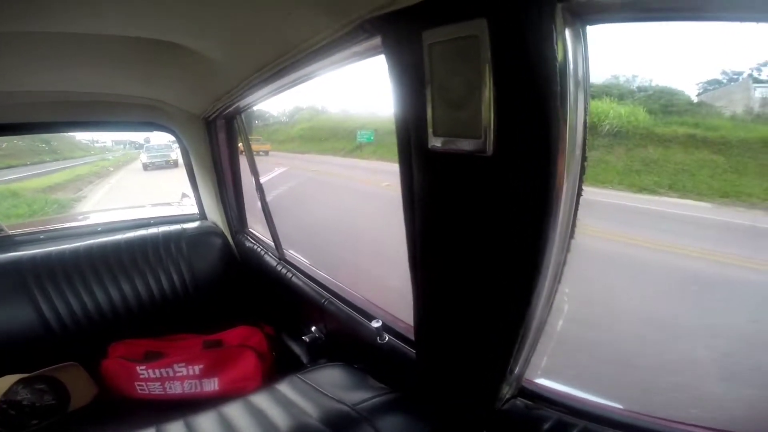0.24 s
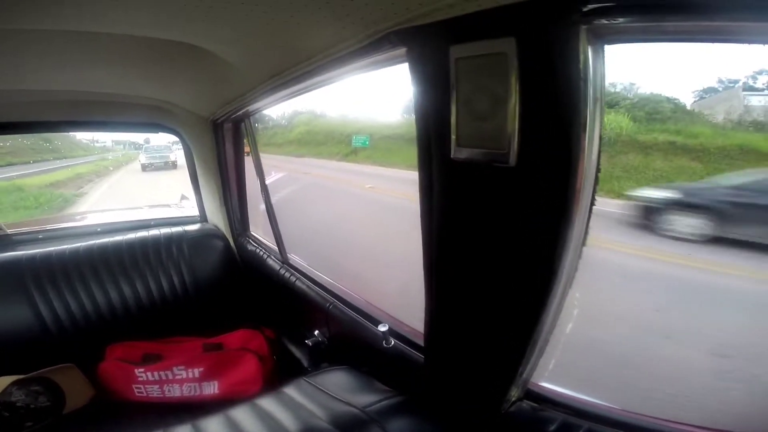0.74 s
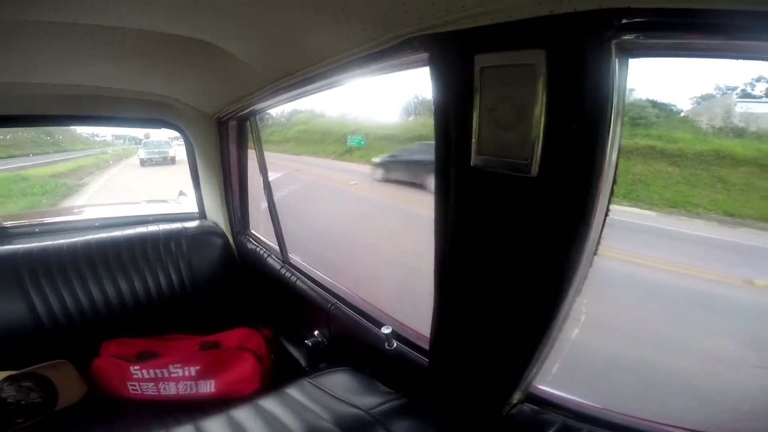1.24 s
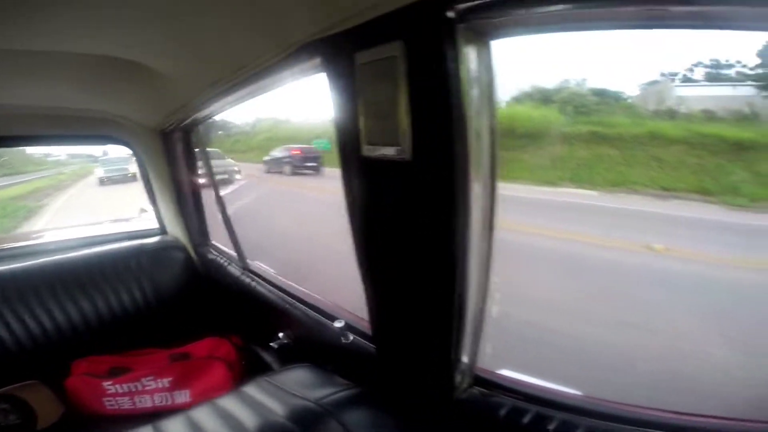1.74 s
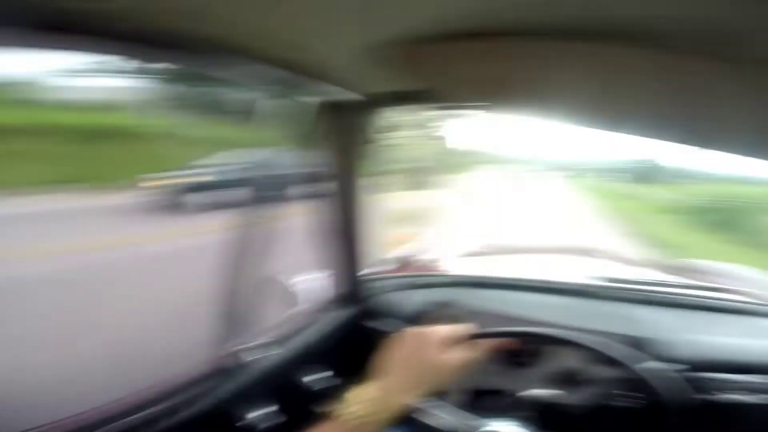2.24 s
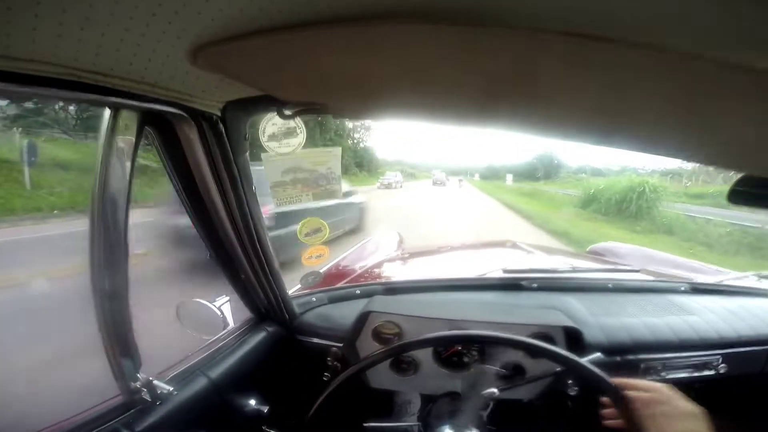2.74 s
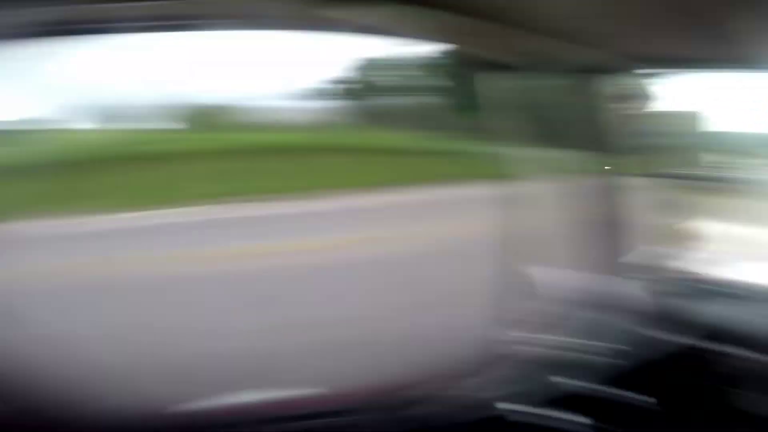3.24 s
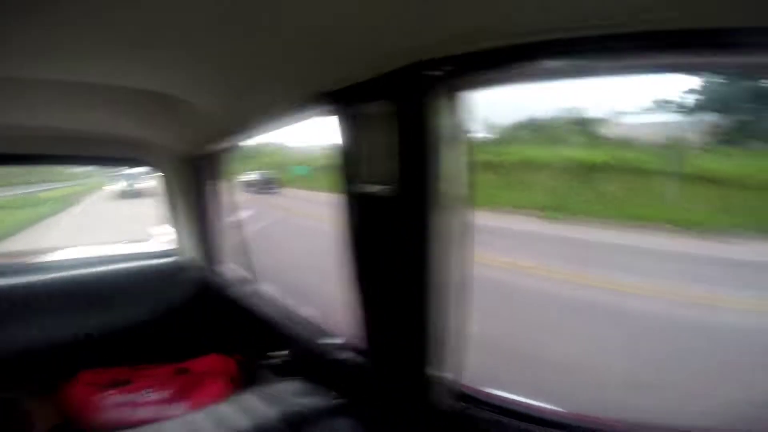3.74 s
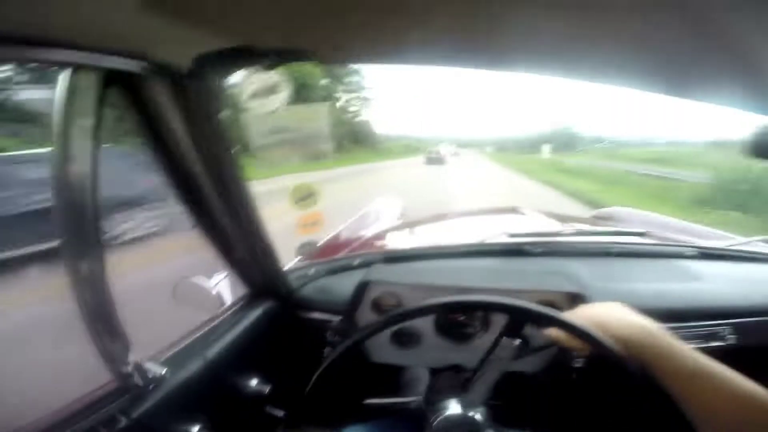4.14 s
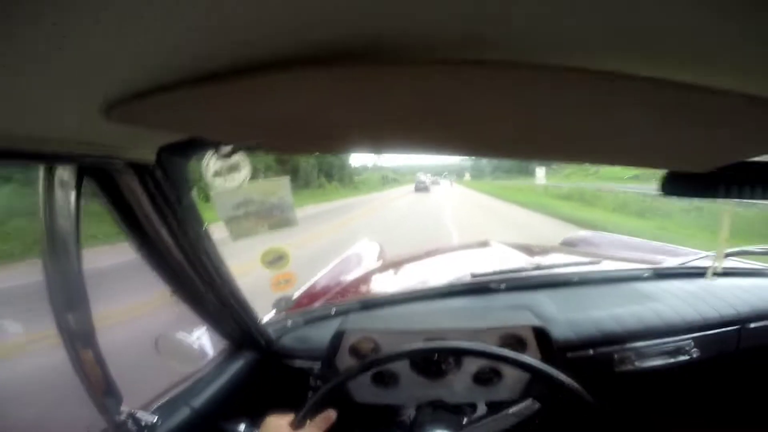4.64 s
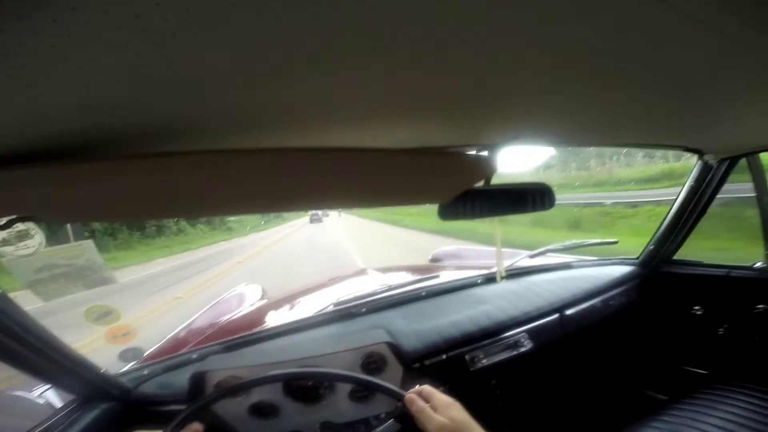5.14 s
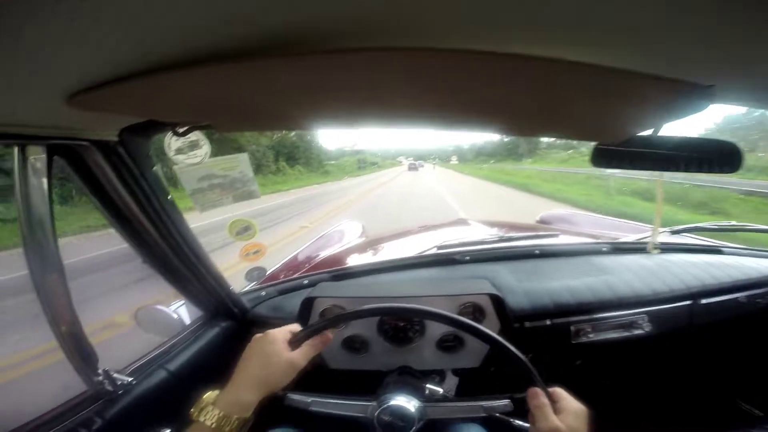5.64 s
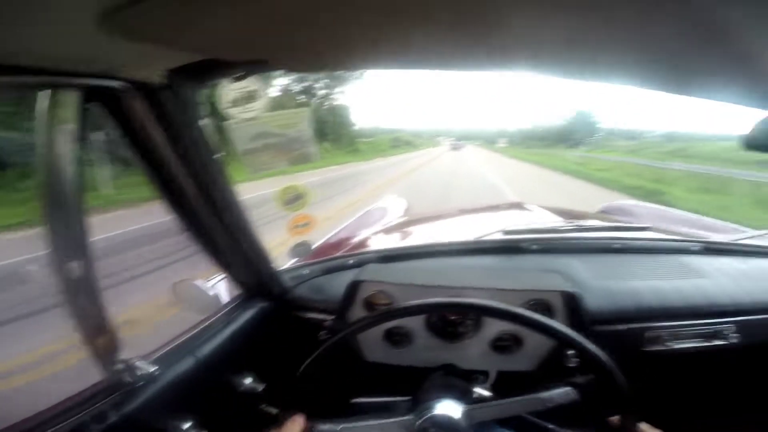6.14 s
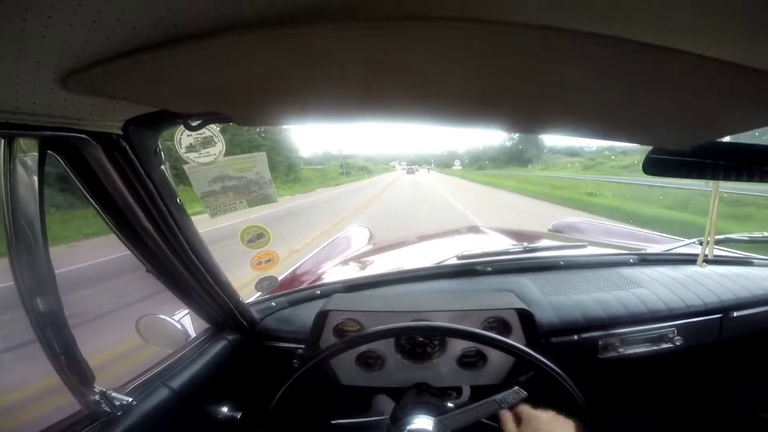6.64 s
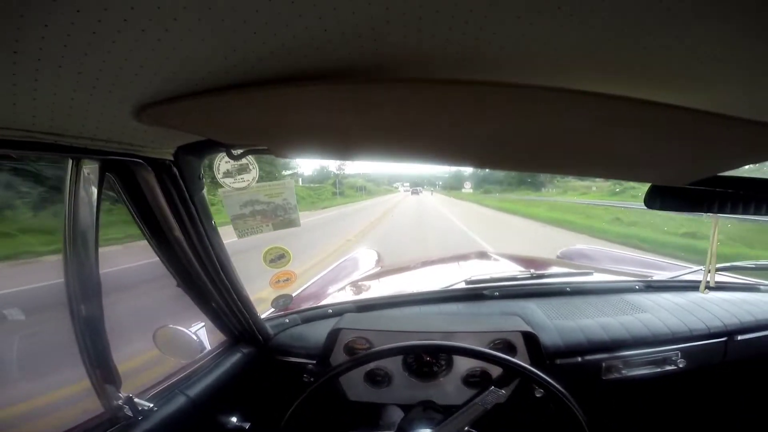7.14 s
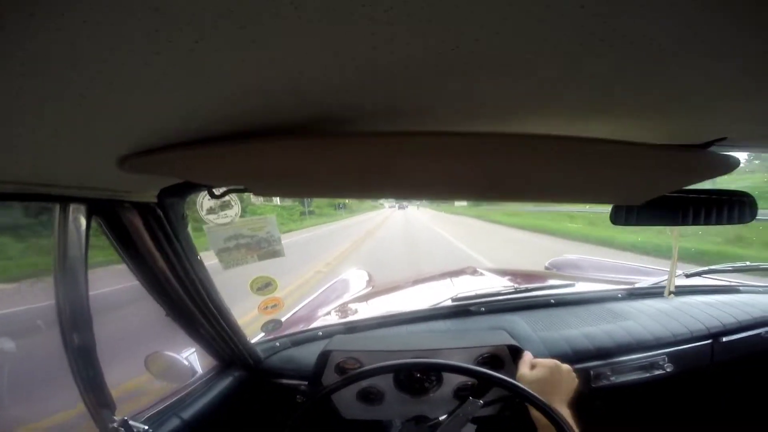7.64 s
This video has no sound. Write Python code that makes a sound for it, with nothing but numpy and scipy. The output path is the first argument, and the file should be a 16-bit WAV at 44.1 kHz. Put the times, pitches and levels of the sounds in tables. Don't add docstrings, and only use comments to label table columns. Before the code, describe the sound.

Close, boomy cabin sound of a vintage car leaving the roadside. Low uneven idle burble and faint electronic hiss come first, then a rush of passing traffic as the car moves off. The engine roars upward, falls for a clattering gear change with small squeaks, and climbs again with whining gears, road roar, buzzing panels and airy window hiss, finally dropping as the driver lifts off.

```python
import sys
import numpy as np
from scipy import signal
from scipy.fft import rfft, irfft
from scipy.io import wavfile
from scipy.ndimage import uniform_filter1d

SR = 44100
rng = np.random.default_rng(int(sys.argv[2]) if len(sys.argv) > 2 else 0)


def boost_factor(decibels):
    exponent = np.asarray(decibels, float) / 20
    return 10 ** exponent


def master(y):
    cut = np.clip(np.atleast_2d(y).T, -1, 1)
    pcm = np.round(cut * 32767)
    wavfile.write(sys.argv[1], SR, pcm.astype(np.int16))


N = 348390
WHINE_ORDER = 25


def rms_one(x):
    return x / np.sqrt(np.mean(x ** 2) + 1e-20)


def in_time(rows):
    s, *columns = np.transpose(rows)
    return [np.interp(np.arange(N) / SR, s, c) for c in columns]


def drift(rate_hz):
    r = np.exp(-80 * np.pi * rate_hz / SR)
    slow = signal.lfilter([1], [1, -2 * r, r * r], rng.standard_normal(N // 40 + 2002))[2000:]
    return np.interp(np.arange(N) / 40, np.arange(len(slow)), rms_one(slow))


def power_sum(*levels_db):
    return 10 * np.log10(sum(boost_factor(2 * db) for db in levels_db))


def bells_db(rows):
    t = np.arange(N) / SR
    return sum(db * np.exp(-((t - s) / spread) ** 2) for s, spread, db in rows)


def cabin_gain(hz):
    # centre in Hz, width in Hz, level in dB
    cabin = [(137, 36, 0), (204, 30, 2), (258, 24, -17), (300, 50, -17), (385, 40, -14), (458, 26, -12),
             (552, 16, -9), (610, 36, -14), (755, 24, -15), (826, 16, -12)]
    power = sum(boost_factor(2 * db) / (1 + (2 * (hz - centre) / width) ** 2) ** 2 for centre, width, db in cabin)
    return np.sqrt(power + boost_factor(-50.5))


def coloured(spectrum, patchy_db, ringing=0):
    hz = np.arange(N // 2 + 1) * SR / N + 1e-9
    points, db = np.transpose(spectrum)
    shape = boost_factor(np.interp(np.log(hz), np.log(points), db, left=-120, right=-120))
    shape = shape * (1 + ringing * cabin_gain(hz) * (hz / 300) ** 1.5)
    white = rfft(rng.standard_normal(N)) * shape
    edges = np.geomspace(points[0], points[-1], num=5)
    bands = [irfft(white * ((hz >= a) & (hz < b)), N) for a, b in zip(edges, edges[1:])]
    return rms_one(sum(band * boost_factor(patchy_db * drift(14)) for band in bands))


def engine_levels(firing_hz, throttle_db):
    # firings per s, firing tone in dB, low boom orders in dB, orders above it in dB
    full_load = [(39, -21.5, -29.5, -23), (60.9, -13, -8.5, -22), (74.6, -18.5, -23.5, -22),
                 (85, -16.5, -19.5, -21.5), (95.7, -17, -18.5, -20), (101.5, -14, -18, -20.5),
                 (111.2, -12.5, -17.5, -17), (121.3, -14.5, -28.5, -18.5), (128, -17.5, -33, -20),
                 (136, -23, -41.5, -19), (144, -20.5, -27, -17.5)]
    # time in s, spread in s, loss in dB (< 0 gains)
    tone_dips = [(.15, 0.16, 8), (.95, .05, 9), (1.25, .35, -4), (1.75, 0.13, -3), (2.12, 0.092, -3),
                 (4.1, 0.066, 2), (4.53, 0.09, 7), (5.25, .08, 4.5), (6.2, 0.091, 4.5), (7.55, 0.15, -5.5),
                 (7.85, 0.1, 6), (2.4, 0.039, 9), (2.731, 0.037, 8), (4.41, 0.058, 10), (4.68, 0.076, 10),
                 (5.03, 0.048, 4)]
    # start in s, rate in Hz, depth in dB, decay in s
    shuffle = [
        (2.08, 2.5, 14, 0.19),
        (2.8, 1.6, 2, 0.84),
        (5.1, 3.7, 4, 0.62),
    ]
    # time in s, spread in s, change in dB
    boom_swells = [(3.15, 0.18, -6), (3.75, 0.14, 3), (4.0, 0.12, 1.5), (5.3, 0.16, 2), (6.34, 0.14, 3.5),
                   (6.83, 0.11, 5), (7.31, .1, 2.5)]
    t = np.arange(N) / SR
    rate, *full_db = np.transpose(full_load)
    follows = (0.47, 0.99, 1)
    tone_db, low_db, high_db = [np.interp(firing_hz, rate, db) + share * throttle_db
                                for db, share in zip(full_db, follows)]
    lift_db = np.minimum(20 * np.log10(cabin_gain(WHINE_ORDER * firing_hz / 6)), -11.5)
    whine_db = -21.5 + 8.5 * np.log2(firing_hz / 100) + 0.45 * lift_db + 0.64 * throttle_db
    whine_db = whine_db - 9 * (t < 5.05)
    rock_db = sum(db * (t > s) * np.exp(-np.abs(t - s) / decay) * np.sin(2 * np.pi * hz * (t - s))
                  for s, hz, db, decay in shuffle)
    return tone_db - bells_db(tone_dips), low_db + rock_db, high_db + bells_db(boom_swells), whine_db


def engine(firing_hz, tone_db, low_db, high_db, whine_db):
    # multiple of the cycle rate, level in dB, change at low speed in dB
    order_db = [(3, -8, 0), (4, -13, -4), (5, -10, -4), (7, -4, 0), (8, 0, 2), (9, 4, -5), (10, 1, -6),
                (11, 0, -7), (12, 4, 1), (13, -5, -5), (14, -2, -2), (15, 4, -2), (16, -2, -3), (17, -2, 5),
                (18, -2, -2), (19, 2, -3)]
    # multiple of the cycle rate, level against the whine in dB
    whine_mates = [(19.3, -6), (27.6, -10), (32, -4), (36, -9)]
    upper_orders = [(k, -6, 0) for k in range(20, 43) if k not in (25, 32, 36)]
    cycle = 2 * np.pi * np.cumsum(firing_hz * (1 + .002 * drift(6))) / SR / 6
    coarse, sample = np.arange(0, N, 200), np.arange(N)

    multiples, level_db, slow_db = np.transpose(order_db + upper_orders)
    hz = multiples[:, None] * firing_hz[coarse] / 6
    slowness = np.interp(firing_hz[coarse], (72, 86), [1, 0])
    gains = boost_factor(level_db[:, None] + slow_db[:, None] * slowness) * cabin_gain(hz)
    upper = 1 / (1 + np.exp((172 - hz) / 3))
    gains = sum(share * gains * boost_factor(db[coarse] + 1.5) / np.sqrt(np.sum(share * gains ** 2, axis=0))
                for share, db in [(1 - upper, low_db), (upper, high_db)])
    orders = np.zeros(N)
    unsteady = .19 * (100 / firing_hz) ** 1.5
    for k, gain in zip(multiples, gains):
        level = np.interp(sample, coarse, gain) * boost_factor(1.6 * drift(5))
        orders += level * np.sin(k * cycle + rng.uniform(0, 7) + unsteady * drift(3))

    tone = boost_factor(tone_db + 1.2 * drift(6)) * np.sin(6 * cycle)
    whine = boost_factor(whine_db + 1.5 + 1.6 * drift(8)) * np.sin(WHINE_ORDER * cycle + .5 * drift(8))
    thinning_db = .35 * np.maximum(firing_hz - 118, 0)
    for k, db in whine_mates:
        whine += boost_factor(whine_db + db - thinning_db + 3 * drift(5)) * np.sin(k * cycle + .5 * drift(6))

    panel_hz, panel_width_hz = 824, 22
    detune = (6 * firing_hz - panel_hz) / panel_width_hz
    climbing = uniform_filter1d(1. * (np.gradient(firing_hz) > 0), size=2000)
    panel = boost_factor(-3 + high_db + 1.1 * drift(22.0)) * np.exp(-detune ** 2 * 3) * climbing
    panel = panel * np.sin(2 * np.pi * panel_hz * sample / SR)
    return np.sqrt(2) * (tone + orders + panel + whine), cycle


def rasp(cycle, firing_hz, throttle_db):
    # mode in Hz, width in Hz, level in dB
    rasp_modes = [(140.5, 26, -4), (201.7, 12.4, 3.5), (259.7, 44, -11), (302.2, 48, -13.5), (452, 13, -12),
                  (505, 17, -10), (564.5, 18, -12.5), (598, 32, -16), (631, 33, -17), (838, 11, -16.5)]
    firings = cycle * 6 / (2 * np.pi)
    strength = boost_factor(3.5 * rng.standard_normal(2000))[firings.astype(int)]
    puffs = strength * np.exp(-2.5 * (firings % 1)) * rng.standard_normal((2, N))
    rung = 0
    for hz, width, db in rasp_modes:
        r = np.exp(-np.pi * width / SR)
        poles = [(1 - r * r) / 2, 0, (r * r - 1) / 2, 1, -2 * r * np.cos(2 * np.pi * hz / SR), r * r]
        rung = rung + boost_factor(db) * signal.sosfilt([poles, poles], puffs[0])
    burble = signal.sosfilt(signal.butter(3, (136, 260), "band", fs=SR, output="sos"), puffs[1])
    doublings = np.log2(firing_hz / 100)
    rasp_db = -23 + throttle_db - 0.2 * doublings
    burble_db = -31.5 - 4 * (doublings + 2.3)
    return boost_factor(rasp_db) * rms_one(rung) + boost_factor(burble_db) * rms_one(burble)


def noise_levels(firing_hz, throttle_db):
    # start in s, hold in s, level in dB
    traffic = [(.1, 0.78, -16.5), (1.602, 0.12, -11), (1.933, 0.076, -8.5), (2.216, 0.1, -0.5),
               (2.417, 0.32, -0.2), (2.937, 0.17, -3), (3.298, 0.18, -7), (3.587, 0.037, -6.5),
               (4.154, 0.086, -6.5), (5.145, 0.085, -6.5), (6.292, 0.19, -6.5), (6.703, 0.21, -4.5),
               (7.095, 0.34, -3)]
    # time in s, spread in s, level in dB
    jolts = [(.4, 0.032, -22), (.9, 0.13, -34), (2.17, 0.086, -26), (2.5, 0.27, -21), (3.3, 0.11, -28),
             (3.609, 0.06, -18), (4.08, 0.064, -17.5), (4.25, 0.089, -25), (4.55, 0.13, -20.5),
             (4.8, 0.057, -35), (4.97, 0.044, -21), (5.24, 0.076, -17), (5.9, 0.071, -32.5),
             (6.72, 0.089, -25.5), (6.99, 0.053, -25.5), (7.5, 0.17, -24), (7.86, 0.043, -22)]
    # time in s, spread in s, level in dB
    slips = [(2.65, 0.094, -21), (3.05, 0.25, -23), (3.42, 0.11, -22), (4.5, 0.076, -24.5),
             (5.15, 0.19, -28), (5.42, 0.12, -24.5), (6.12, 0.054, -28)]
    roar_law, tyres_law, air_law = (-24.5, -0.02, 5.5, -24.5), (-43, 0.11, 2, -39.5), (-60.5, .15, 3.5, -61)
    approach_s, recede_s = 0.19, 0.14
    t = np.arange(0, N, 50) / SR
    doublings = np.log2(firing_hz[::50] / 100)
    near_db = power_sum(*(db - 12.0 * (np.maximum(s - t, 0) / approach_s) ** 2
                          - 5.5 * np.maximum(t - s - hold, 0) / recede_s for s, hold, db in traffic))
    shake_db = -31 - doublings
    thump_db = power_sum(shake_db, *(db - 2.7 * ((t - s) / spread) ** 2 for s, spread, db in jolts))
    steady_db = [power_sum(db + share * throttle_db[::50] + slope * doublings, car_db + near_db)
                 for db, share, slope, car_db in (roar_law, tyres_law, air_law)]
    steady_db[0] = power_sum(steady_db[0], *(db - 2.4 * ((t - s) / spread) ** 2 for s, spread, db in slips))
    return [np.interp(np.arange(N) / SR, t, db) for db in [thump_db, *steady_db]]


def noises(cycle, thump_db, roar_db, tyres_db, air_db):
    # frequency in Hz, density in dB per Hz
    thump_shape = [(12, -20), (18, -2), (26, 0), (36, -2), (50, -6), (70, -12), (95, -30)]
    roar_shape = [(40, -34), (55, -7), (100, -1.5), (170, -5), (250, -11), (290, -9.5), (500, -14.5),
                  (700, -13.5), (860, -20.5), (1000, -39), (1300, -46), (1700, -71.5)]
    tyres_shape = [(600, -26), (950, -1.5), (1200, -8), (1440, -13.5), (1590, -9.5), (2000, -15.5),
                   (2300, -16.5), (2600, -22), (2800, -29), (3100, -33), (3600, -57)]
    hiss_shape = [(2400, -24), (2900, -4.5), (3300, 2), (3800, -2), (4400, -0.3), (5000, 1), (5700, -1.5),
                  (6400, -6), (7500, -9), (9000, -11.5), (10500, -13), (12000, -20.5), (13500, -20.5),
                  (15200, -43)]
    throb = 1 + .15 * np.sin(6 * cycle) + .1 * np.sin(3 * cycle)
    thump = boost_factor(thump_db + 3.0) * coloured(thump_shape, patchy_db=0.0)
    roar = boost_factor(roar_db + 2.0) * throb * coloured(roar_shape, patchy_db=1.0, ringing=1.82)
    tyres = boost_factor(tyres_db + 3.5) * coloured(tyres_shape, patchy_db=0.9)
    air = boost_factor(air_db + 1.24) * coloured(hiss_shape, patchy_db=1.0)
    return thump + roar + tyres + air


def noise_around(centre_hz, half_hz):
    phase = 2 * np.pi * np.cumsum(centre_hz) / SR
    slow = signal.sosfilt(signal.butter(4, half_hz, fs=SR, output="sos"), rng.standard_normal((2, N)))
    return rms_one(slow[0] * np.cos(phase) + slow[1] * np.sin(phase))


def passing():
    # time in s, tyre band centre in Hz, level in dB
    tyre_band = [(1.9, 2040, -53), (2.1, 2060, -45.5), (2.27, 1972, -40), (2.45, 1800, -36),
                 (2.62, 1588, -37), (2.74, 1500, -39), (2.8, 1497, -46.5), (2.95, 1440, -58),
                 (3.1, 1420, -85.5)]
    # time in s, tread hiss in dB
    tread_hiss = [(2.1, -80), (2.3, -70), (2.48, -61), (2.65, -60), (2.8, -65.5), (3.0, -73), (3.2, -80)]
    hz, db = in_time(tyre_band)
    hiss_db, = in_time(tread_hiss)
    tyre = noise_around(hz, 400) + boost_factor(3.5) * noise_around(hz, 110)
    return boost_factor(db - 8.0) * tyre + boost_factor(hiss_db) * noise_around(np.full(N, 5000), 600)


def buzzes():
    # time in s, spread in s, centre in Hz, width in Hz, level in dB
    narrow_swells = [(.04, 0.037, 835, 18, -36.5), (.38, 0.11, 551, 15, -36), (1.8, 0.074, 135.5, 24, -25.5),
                     (1.929, 0.036, 214, 47, -29.5), (2.381, 0.084, 1870, 100, -48),
                     (2.65, 0.093, 1031, 210, -30.5), (3.14, 0.1, 452, 19, -27),
                     (3.34, 0.11, 461, 20, -26.5), (3.45, 0.052, 578, 19, -24),
                     (3.76, 0.19, 256, 28.5, -25.5), (4.3, 0.3, 830.6, 25.7, -33.5),
                     (4.62, 0.16, 835, 16, -37.5), (5.12, 0.11, 454.5, 19, -25.5),
                     (5.42, 0.17, 505, 17, -32.5), (5.75, 0.12, 595, 16, -33.5),
                     (6.65, 0.068, 768, 12, -29.5), (.25, .13, 9300, 900, -71), (.4, .3, 7430, 400, -76),
                     (.85, .2, 7400, 370, -78), (7.38, 0.048, 550, 10, -35), (2.27, 0.086, 128, 30, -21),
                     (2.3, 0.055, 195, 13.5, -27), (2.75, 0.045, 125, 29.4, -23),
                     (3.17, 0.16, 276, 62, -25.5), (4.2, 0.072, 1606, 100, -46), (7.2, 0.14, 459, 12, -31.5),
                     (2.55, .08, 1720, 110, -46.5), (2.4, 0.066, 2190, 150, -50),
                     (2.719, .05, 1560, 70, -45), (7.249, 0.17, 383.7, 16, -27), (6.15, .1, 306, 16, -32),
                     (.2, .15, 13200, 900, -82.5), (.7, 0.3, 760, 20, -42.5), (1.001, 0.15, 551, 8, -40.5),
                     (1.45, 0.31, 553, 8.5, -47), (1.55, 0.071, 2140, 300, -52), (1.9, 0.17, 2150, 460, -53),
                     (2.201, 0.031, 1310, 120, -41), (2.55, 0.15, 9400, 1500, -69),
                     (6.8, 0.11, 552, 7.5, -30), (7.2, .12, 598, 15, -26.5), (7.47, 0.064, 130.6, 23, -16.5)]
    out, waver = np.zeros(N), drift(7)
    for s, spread, hz, width, db in narrow_swells:
        at = np.arange(max(round((s - .4) * SR), 0), round((s + .4) * SR))
        band = signal.butter(2, [hz - width / 2, hz + width / 2], "band", fs=SR, output="sos")
        noise = signal.sosfilt(band, rng.standard_normal(53000))[-len(at):]
        if width < 25:
            singing = np.sin(2 * np.pi * hz * at / SR + width / 20 * waver[at])
            noise = .5 * rms_one(noise) + np.sqrt(2) * singing
        swell = np.exp(-((at / SR - s) / spread) ** 2)
        out[at] += boost_factor(db) * swell * noise / np.sqrt(np.sum((swell * noise) ** 2) / np.sum(swell ** 2))
    return out


def knocks():
    # time in s, pitch in Hz, peak in dB, 60 dB decay in s
    floor_knocks = [
        (2.3, 52, -16, .3),
        (3.57, 33, -12, .3),
        (4.06, 50, -17, .25),
        (4.52, 45, -11, .35),
    ]
    out = np.zeros(N)
    for s, hz, db, t60 in floor_knocks:
        t = np.maximum(np.arange(N) / SR - s, 0)
        ring = np.sin(2 * np.pi * hz * t) + 0.67 * np.sin(2 * np.pi * 1.7 * hz * t)
        out += boost_factor(db - 60 * t / t60) * (1 - np.exp(-t / .012)) * ring
    return out


def ticks():
    # start in s, peak in dB, centre in Hz, width in octaves, 60 dB decay in s
    trim_ticks = [(.15, -62, 9300, .6, .4), (1.185, -59, 6000, 1.3, .12), (1.99, -56, 5000, 1.5, .08),
                  (2.29, -57, 8950, .6, .05), (3.558, -48, 4000, 1.6, .1), (3.728, -55, 7400, 1.6, .12),
                  (4.055, -52, 5200, .4, .06), (4.090, -48, 7300, 1.7, .04), (4.131, -42, 7700, 1.8, .035),
                  (4.14, -53, 7000, 1.6, .2), (4.548, -39, 4700, .8, .12), (4.551, -54, 8000, .9, .06),
                  (4.661, -57, 8140, .8, .18), (4.680, -40, 7300, 1.2, .06), (4.686, -45, 5000, 1.4, .2),
                  (4.703, -49, 6000, 1.1, .04), (4.724, -47, 3600, .6, .08), (4.738, -42, 4500, .9, .1),
                  (4.743, -47, 6500, 1.2, .06), (4.756, -45, 5000, .8, .12), (5.012, -48, 4000, 1.1, .07),
                  (5.028, -50, 4700, .6, .2), (7.521, -56, 7320, 1.3, .12), (7.531, -53, 8300, 1.3, .08),
                  (3.56, -36, 1800, 1.0, .12), (4.551, -31, 1700, 1.3, .1), (4.684, -30, 1700, 1.3, .1),
                  (4.724, -31, 1700, 1.3, .2), (4.74, -29, 1700, 1.3, .14), (4.997, -26, 1800, .6, .2),
                  (5.008, -27, 2000, .8, .12)]
    out, t = np.zeros(N + 6000), np.arange(6000) / SR
    for s, db, hz, octaves, t60 in trim_ticks:
        band = np.clip(hz * 2 ** (np.array([-.5, .5]) * max(octaves, .2)), 500, 18000)
        envelope = (boost_factor(-60 * t / max(t60, .01)) + .6 * np.exp(-t / .002)) * np.minimum(t / .0008, 1)
        burst = rng.standard_normal(len(t)) * envelope
        burst[30] += 5.0
        band_filter = signal.butter(3, band, "band", fs=SR, output="sos")
        out[round(s * SR):][:len(t)] += boost_factor(db) * signal.sosfilt(band_filter, burst)
    return signal.sosfilt(signal.butter(2, 10500, fs=SR, output="sos"), out[:N])


def squeaks():
    # start in s, length in s, start pitch in Hz, end pitch in Hz, level in dB
    hinge_squeaks = [(1.188, .03, 7360, 7300, -60), (3.563, 0.02, 5700, 5600, -55.5),
                     (3.572, 0.034, 4740, 4470, -52.5), (3.721, 0.022, 7500, 7460, -55),
                     (4.234, .014, 11000, 11670, -56), (4.248, 0.031, 11700, 12860, -62),
                     (4.256, 0.022, 14040, 14100, -63), (4.682, 0.028, 5570, 5580, -50),
                     (5.026, 0.027, 4880, 4840, -50.5), (7.306, 0.015, 10500, 10460, -65),
                     (7.31, 0.032, 11320, 11260, -60)]
    out, rough = np.zeros(N), .7 + .7 * drift(260)
    for s, length, start_hz, end_hz, db in hinge_squeaks:
        at = round(s * SR) + np.arange(round(length * SR))
        envelope = np.sin(np.linspace(.2, 2.9, len(at))) ** .5
        glide = np.sin(2 * np.pi * np.cumsum(np.linspace(start_hz, end_hz, len(at))) / SR)
        out[at] += boost_factor(db) * envelope * rough[at] * glide
    return out


def electronics():
    # tone in Hz, level in dB
    faint_tones = [(8780, -85), (11687, -88), (11719, -85), (14626, -98)]
    # frequency in Hz, hiss density in dB per Hz
    preamp_shape = [(3000, -9.5), (7400, -1), (7700, -4.5), (11500, -4.5), (13500, -9), (14800, -8.5),
                    (15400, -19)]
    t = np.arange(N) / SR
    fade_db = np.interp(t, [3.3, 3.6], [0, -8])
    tones = sum(np.sqrt(2) * boost_factor(db + .6 * drift(3)) * np.sin(2 * np.pi * hz * t) for hz, db in faint_tones)
    hiss = boost_factor(-72.5 + 0.49 * fade_db) * coloured(preamp_shape, patchy_db=-0.5)
    return boost_factor(fade_db) * tones + hiss


def scene():
    # time in s, firings per s
    speed = [(0, 48), (.75, 40.9), (1.05, 40), (1.55, 39.9), (1.9, 36.8), (2.05, 37.5), (2.25, 48.7),
             (2.63, 65), (2.76, 64), (2.98, 70.1), (3.2, 70.6), (3.28, 72), (3.45, 84.5), (3.9, 106),
             (4.15, 119.7), (4.29, 124), (4.7, 96.5), (5.0, 79.5), (5.15, 98), (5.29, 105), (5.48, 95.5),
             (5.63, 100.8), (6.0, 110.2), (7.26, 143), (7.4, 139.5), (7.9, 105)]
    # time in s, level in dB
    throttle = [(0, -11), (.5, -12), (2.05, -15), (2.25, -7), (2.45, -18), (2.75, -10), (3.0, 3),
                (3.9, -1.4), (4.2, -2), (4.38, -16), (4.7, -6), (5.02, -12), (5.13, -0.5), (6.0, -3.5),
                (6.5, -1.1), (7.34, 0), (7.44, -15.5), (7.9, -10.5)]
    firing_hz, = in_time(speed)
    throttle_db, = in_time(throttle)
    motor, cycle = engine(firing_hz, *engine_levels(firing_hz, throttle_db))
    exhaust = rasp(cycle, firing_hz, throttle_db)
    rush = noises(cycle, *noise_levels(firing_hz, throttle_db))
    cabin_noises = buzzes() + knocks() + ticks() + squeaks()
    return (motor + exhaust + rush + passing() + cabin_noises + electronics())[None]


def dropouts(x):
    hz, t, frames = signal.stft(x, SR, nperseg=1024)
    chance = uniform_filter1d(rng.standard_normal((41, len(t))), size=9)
    shared = chance[40]
    band = np.minimum(hz // 260 - 20, 39).astype(int)
    chance = rms_one(chance[:40] + .6 * shared)[band]
    threshold = np.interp(hz, (11800, 15400), (1.9, -.3))
    muted = (chance > threshold[:, None]) & (hz > 11800)[:, None]
    return signal.istft(frames * np.where(muted, boost_factor(-22), 1), SR, nperseg=1024)[1][:, :N]


def top_cut(x):
    return signal.sosfilt(signal.butter(12, 15300, fs=SR, output="sos"), x)


def record(dry):
    coupling = signal.butter(2, 16, "high", fs=SR, output="sos")
    wired = dropouts(signal.sosfilt(coupling, dry - dry[:, :1]))
    limited = 1.15 * np.tanh(wired / 1.15)
    return top_cut(limited)


dry = scene()
out = record(dry)
master(out)
```